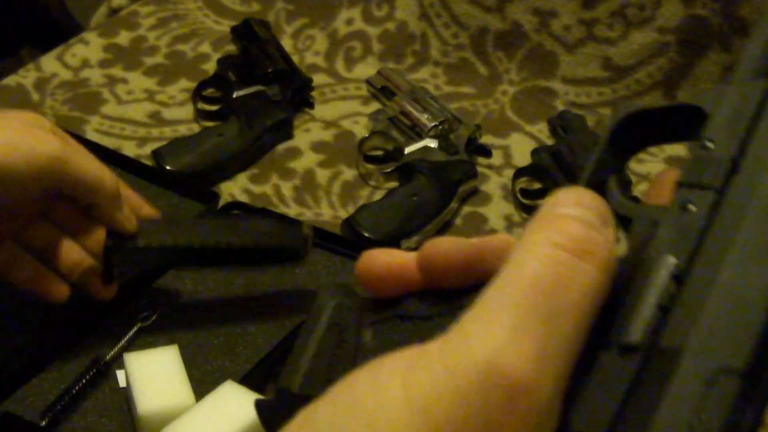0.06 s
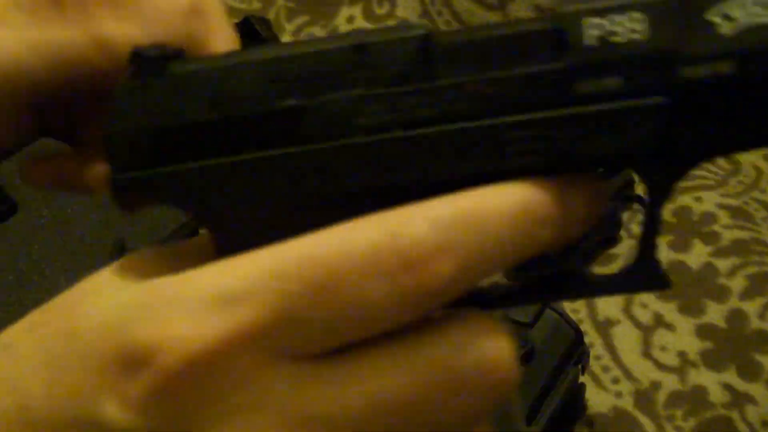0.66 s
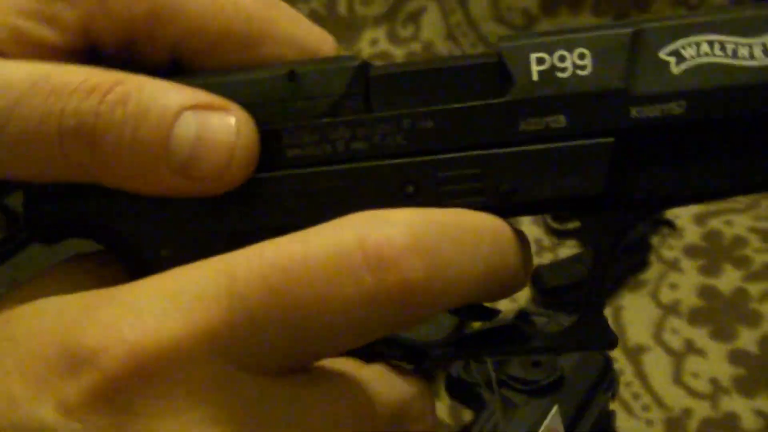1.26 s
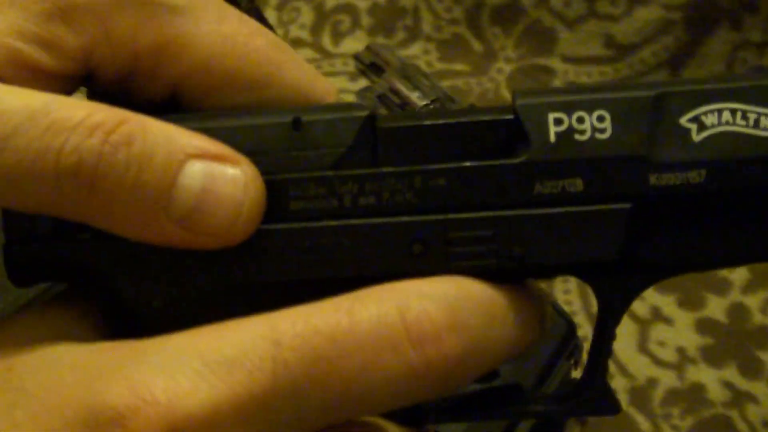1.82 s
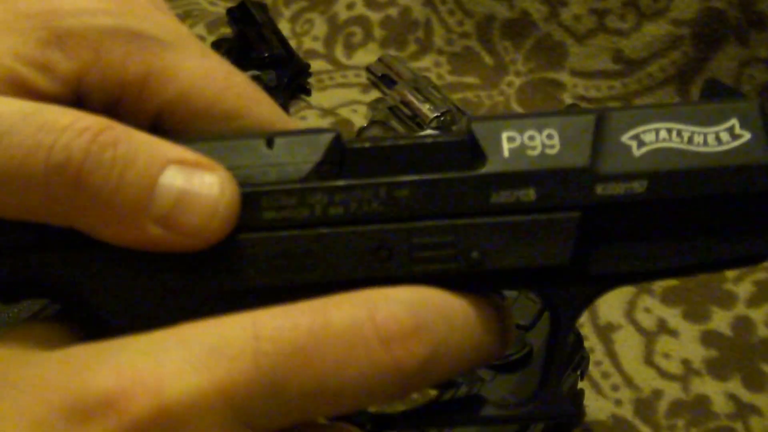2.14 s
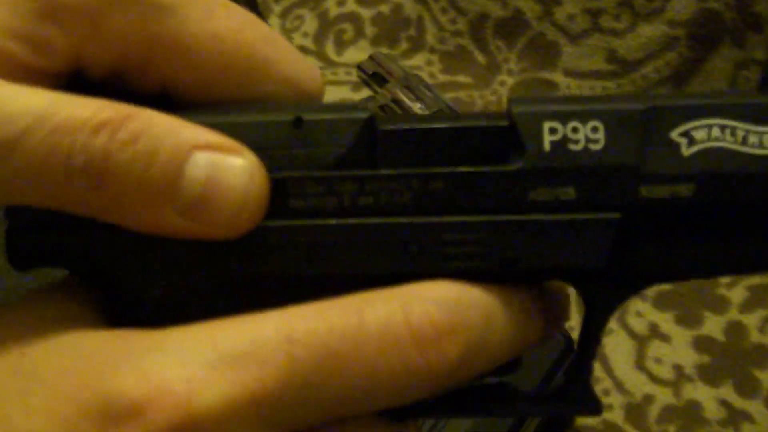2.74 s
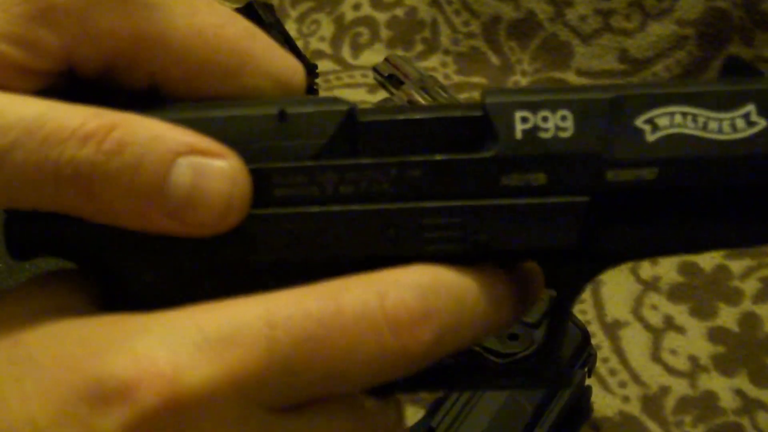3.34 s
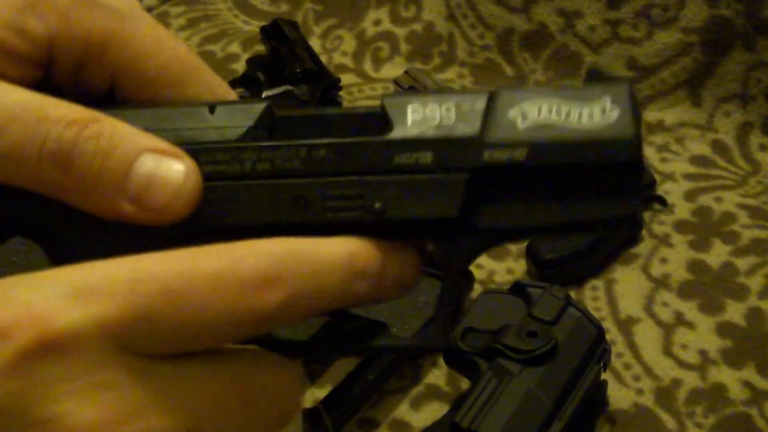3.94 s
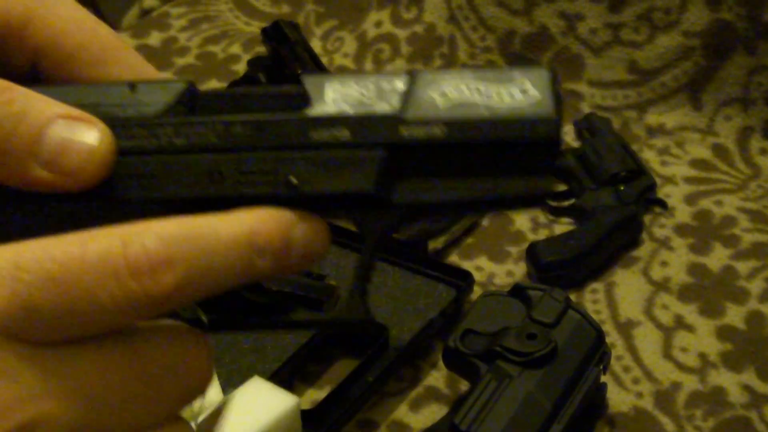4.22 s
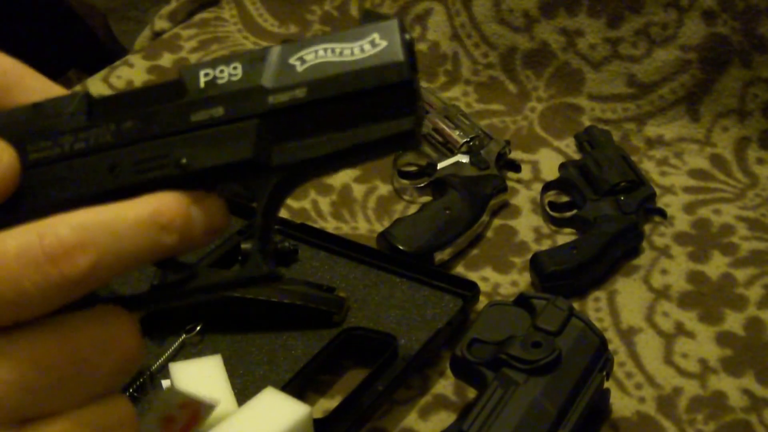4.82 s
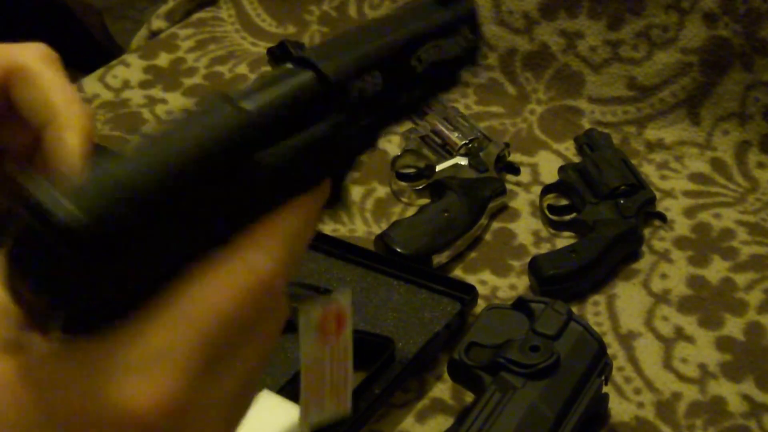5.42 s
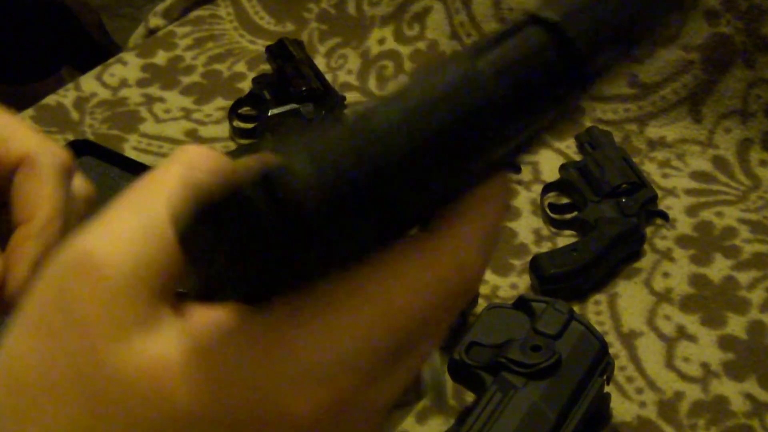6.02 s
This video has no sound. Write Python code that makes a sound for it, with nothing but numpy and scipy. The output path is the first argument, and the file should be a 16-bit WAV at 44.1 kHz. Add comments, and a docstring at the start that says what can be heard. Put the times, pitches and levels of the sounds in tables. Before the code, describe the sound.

In a furnished room, fingers softly rub a pistol close to the microphone, and its magazine knocks down on a hard case a little farther off. After a pause the slide is racked with steel scrapes and clicks, then slams shut loudly. The action snaps three times, loose parts rattle, and a faint rub and click follow. Steady room noise lies underneath, and each blow has a short fluttering echo.

```python
"""A pistol handled in a furnished room, close to the two microphone ports of a small camera.
Over steady room noise, fingers rub the gun and its magazine knocks down on a hard case farther off.
The slide is racked, steel scraping and clicking on steel, and slams shut; the action snaps three times,
loose parts rattle, and a last faint rub and click follow. The room answers each blow with a short
flutter, and the loudest blows overload the microphone and its limiter."""
import sys
import numpy as np
from scipy import signal
from scipy.fft import rfft, irfft, next_fast_len
from scipy.io import wavfile
from scipy.ndimage import uniform_filter1d

SR = 44100
rng = np.random.default_rng(int(sys.argv[2]) if len(sys.argv) > 2 else 0)


def to_wav(s):
    """Save 16-bit WAV."""
    ch = np.atleast_2d(s).T  # columns
    pcm = np.round(np.clip(ch, -1, 1) * 32767)  # PCM
    wavfile.write(sys.argv[1], SR, pcm.astype(np.int16))


N = 267631
BLOW_SAMPLES = 4096
BLOW_HZ = np.fft.rfftfreq(BLOW_SAMPLES, 1 / SR)

# spectrum of the gun's steel: frequency_hz, level_db
STEEL_SPECTRUM = [(88, -54.5), (150, -28), (244, -29), (391, -22.5), (514, -15.5), (905, -7.5), (1560, -9),
                  (1940, -4.5), (3040, -4), (3420, -2.5), (7620, -5), (9260, -6.5), (11500, -29.5),
                  (14500, -27.5), (16000, -30.5)]
# ringing partials of that steel, the slide on its rails and the loose parts: pitch_hz, level_db, t60_s
STEEL_RING = [(2497, -2, .24), (3091, -6, .26), (3259, -7, .25), (3567, -9, .22), (3997, -9, .22),
              (4457, -8, .22), (5125, -8, .22), (5421, -6, .22), (5620, -4, .24), (6853, -2, .22),
              (6918, -4, .27), (7456, -5, .2), (7612, -8, .24), (8565, -9, .27), (9114, -7, .21),
              (9340, -8, .22)]
RAIL_RING = [(1470, -1, .15), (2500, 1, .2), (2497, 1.5, 0.1), (3315, -7.5, .2), (3997, -3.5, .2),
             (4392, 1.5, .2), (6380, -6, .18)]
LOOSE_RING = [(1946, -9.5, 0.36), (2120, -11, .22), (2300, -12, 0.15), (3110, -4.5, 0.25),
              (3800, -17, 0.21), (3940, 1.5, .26), (5540, -7, .26), (7460, -1, 0.35)]
# stereo width of case, clicks and snaps at the microphone: frequency_hz, side_minus_mid_db
CASE_WIDTH = [(60, -4), (180, -27), (550, -18.5), (1650, -8.5), (4970, -6), (15000, 13)]
CLICK_WIDTH = [(60, 8), (150, -13.5), (380, -11.5), (950, -21), (2380, -14.5), (5980, -7), (15000, -3.5)]
SNAP_WIDTH = [(60, -11), (240, -4.5), (950, -16.5), (3770, -9), (15000, -1.5)]


def amp(db):
    """Decibels to gain."""
    return 10 ** (np.asarray(db) / 20)


def unit(x):
    """Scales to energy 1 per channel."""
    return x / np.sqrt(np.sum(x ** 2, -1, keepdims=True) + 1e-20)


def curve(points, hz):
    """Interpolates a table on a log-frequency axis."""
    point_hz, value = np.transpose(points)
    return np.interp(np.log(hz + 1), np.log(point_hz + 1), value)


def resonances(modes, hz):
    """Peaks and dips as a dB curve."""
    return sum(db / (1 + (2 * (hz - centre) / width) ** 2) for centre, width, db in modes)


def add(mix, start_s, sound):
    """Mixes a sound in at start_s."""
    part = mix[:, round(start_s * SR):][:, :sound.shape[-1]]
    part += sound[..., :part.shape[1]]


def port_noise(size, width):
    """White noise at two nearby microphone ports, blended from unrelated mid and side signals."""
    side_gain = amp(curve(width, np.fft.rfftfreq(size, 1 / SR)))
    mid, side = rfft(rng.standard_normal((2, size))) / np.sqrt(1 + side_gain ** 2)
    return irfft([mid + side_gain * side, mid - side_gain * side], size)


def noise(colour_db, size, width):
    """Stereo noise of rms 1 with a given spectrum."""
    return unit(irfft(rfft(port_noise(size, width)) * amp(colour_db), size)) * np.sqrt(size)


def room_tone(noise_db=-47, hum_hz=99, hum_db=-64):
    """Steady room noise with a few resonances, microphone hiss and a faint mains hum."""
    # spectrum of the quiet room and the hiss: frequency_hz, level_db
    spectrum = [(25, -36.5), (60, -21), (100, -18.5), (160, -9), (280, -7.5), (460, -10.5), (800, -9.5),
                (1200, -14), (1600, -16.5), (3000, -22.5), (8200, -29.5), (9700, -35), (11000, -47.5),
                (16000, -43)]
    # its peaks and dips: centre_hz, width_hz, gain_db
    modes = [(239.8, 16, 7.5), (656.3, 16.56, 9.5), (1329, 50, 7), (9440, 1520, 4.5), (11700, 2018, -7)]
    # its stereo width: frequency_hz, side_minus_mid_db
    width = [(60, -1.5), (150, -9), (380, -7), (950, 0), (2380, 2.5), (5980, 1), (15000, 0)]
    size = next_fast_len(N, real=True)
    hz = np.fft.rfftfreq(size, 1 / SR)
    air = noise(curve(spectrum, hz) + resonances(modes, hz), size, width)[:, :N]
    hum = np.sqrt(2) * np.sin(2 * np.pi * hum_hz * np.arange(N) / SR)
    return amp(noise_db) * air + amp(hum_db) * hum


def room(sound, width, wet_db, echo_db, linger, build_s=0.0016, cutoff_hz=13500):
    """A flutter between floor and ceiling over a short diffuse tail that lacks the top treble."""
    # decay of the room, before scaling by linger: frequency_hz, t60_s
    decay = [(200, 0.11), (530, 0.34), (1390, 0.27), (3680, 0.28), (9700, 0.23)]
    # early reflections, before echo_db is added: delay_s, level_db
    echoes = [(.0021, -9.5), (.0087, -24), (0.0128, -16.5), (0.0142, -11.5), (.0295, -18), (0.0439, -25)]
    hz, t, bands = signal.stft(port_noise(SR // 2, width), SR, nperseg=256)
    t60_s = linger * curve(decay, hz)[:, None]
    tail = signal.istft(bands * np.exp(-np.log(1000) * t / t60_s), SR)[1]
    onset = 1 - np.exp(-np.arange(tail.shape[1]) / SR / build_s)
    response = amp(wet_db) * unit(tail * onset)
    for delay_s, db in echoes:
        response[:, round(delay_s * SR)] += amp(db + echo_db)
    response = signal.lfilter(*signal.butter(2, cutoff_hz, fs=SR), response)
    return signal.fftconvolve(sound, response, axes=1)[:, :N]


def friction(strokes, grain, slips_per_s):
    """Two surfaces stick and slip unevenly, sounding the steel under each stroke."""
    out = np.zeros((2, N))
    wander = np.interp(np.arange(N) * slips_per_s / SR, np.arange(N), rng.standard_normal(N))
    slips = np.exp(grain * wander)
    hz = np.fft.rfftfreq(SR, 1 / SR)
    for start_s, length_s, db, centre_hz, width_hz in strokes:
        size = int(length_s * SR)
        band_db = -20 * np.log10(1 + (2 * (hz - centre_hz) / width_hz) ** 2)
        hiss = noise(band_db + curve(STEEL_SPECTRUM, hz), SR, CLICK_WIDTH)[:, :size]
        grit = hiss * slips[int(start_s * SR):][:size]
        add(out, start_s, amp(db) * unit(grit) * np.sqrt(size) * np.hanning(size))
    return out


def fingers(centre_hz=4260, width_hz=13000):
    """Skin slides over the gun with a soft, uneven hiss."""
    # finger strokes: start_s, length_s, level_db
    rubs = [(0.273, 0.5, -55), (0.896, 0.31, -58.5), (1.176, 0.096, -53), (1.32, 0.15, -52),
            (1.492, 0.042, -51.5), (1.559, 0.053, -54.5), (5.502, .077, -51), (5.591, 0.086, -55.5)]
    return friction([(*rub, centre_hz, width_hz) for rub in rubs], grain=0.39, slips_per_s=130)


def scrapes():
    """Steel slides on steel between the clicks, with a fine, fast grain."""
    # strokes of the moving parts: start_s, length_s, level_db, centre_hz, width_hz
    strokes = [(.025, 0.044, -37.5, 7000, 8000), (2.445, 0.06, -35, 4500, 11000),
               (2.485, 0.062, -32.5, 3500, 9000), (2.635, 0.28, -36, 3400, 3600),
               (3.92, .22, -27.5, 3130, 1860), (4.08, 0.28, -37.5, 4980, 11000),
               (5.38, .1, -55.5, 2555, 298)]
    return friction(strokes, grain=0.28, slips_per_s=1300)


def blow(body_db, tilt, bass_db, contact_s, width, chatter, chatter_hz=1200, bass_hz=1100, pivot_hz=4000):
    """One impact and the fine chatter of its contact, passed through the resonances of a body."""
    tilt_db = tilt * np.log2(np.clip(BLOW_HZ / pivot_hz, 1 / 2, 2))
    shelf_db = bass_db / (1 + (BLOW_HZ / bass_hz) ** 4)
    log_gain = np.log(amp(np.maximum(body_db + tilt_db + shelf_db, -100)))
    # minimum phase: the body sounds only after it is struck
    body = np.exp(np.conj(signal.hilbert(np.r_[log_gain, log_gain[-2:0:-1]])))[:len(BLOW_HZ)]
    sample = np.arange(BLOW_SAMPLES)
    grit = rfft(unit(port_noise(BLOW_SAMPLES, width) * np.exp(-sample / SR / contact_s)))
    # the bass feels one clean push; only the treble feels the roughness of the contact
    roughness = chatter * BLOW_HZ / np.hypot(BLOW_HZ, chatter_hz)
    force = (1 + roughness * grit) / np.hypot(1, roughness)
    fade = np.minimum(1, 2 - 2 * sample / BLOW_SAMPLES) ** 2
    return unit(irfft(force * body) * fade) * np.sqrt(SR / 1000)


def knocks():
    """The magazine lands on the hard case; the grip bumps in the hand."""
    # dull knocks: start_s, level_db, tilt_db_per_octave, bass_db, contact_s
    hits = [(.3105, -37.5, 8, 3, 0.0069), (0.3698, -33, -9, -9, 0.00095), (0.4805, -3.5, -2, -5.5, 0.00051),
            (2.137, -33.5, -5, 2, 0.0026)]
    # spectrum of the case: frequency_hz, level_db
    case_spectrum = [(60, -22), (110, -15), (170, -3), (300, 0), (500, -2), (800, -1), (1500, -4.5),
                     (2400, -2.5), (3400, -13.5), (5000, -23), (8500, -34), (11000, -41), (16000, -83)]
    # its peaks and dips: centre_hz, width_hz, gain_db
    case_modes = [(257, 28, 18), (360, 45, -30), (666, 41, 11), (1101, 30, 10), (1367, 36, 10),
                  (2530, 2100, 2)]
    body_db = curve(case_spectrum, BLOW_HZ) + resonances(case_modes, BLOW_HZ)
    out = np.zeros((2, N))
    for start_s, db, tilt, bass_db, contact_s in hits:
        add(out, start_s, amp(db) * blow(body_db, tilt, bass_db, contact_s, CASE_WIDTH, chatter=0.33))
    return out


def after_ring(hit, partials, ring_db, spread_db=3):
    """The steel rings on, ring_db relative to the hit; each blow wakes its modes a little differently."""
    hz, mode_db, t60_s = np.transpose(partials)[:, :, None]
    t = np.arange(SR // 3) / SR
    modes = amp(mode_db) * np.exp((2j * np.pi * hz - np.log(1000) / t60_s) * t)
    gains = amp(spread_db * rng.standard_normal(len(modes)))
    phases = np.exp(2j * np.pi * rng.random(len(modes)))
    ring = unit(((gains * phases) @ modes).imag)
    return amp(ring_db) * np.linalg.norm(hit[0]) * ring


def bounces(ticks_per_s=55, jitter=0.6, spread_db=2):
    """Loose parts bounce at uneven gaps in fading runs; gives rows of start_s, level_db, contact_kind."""
    # runs of lesser ticks: start_s, length_s, first_db, fall_db, contact_kind
    runs = [(2.525, 0.076, -13, 12, "rail"), (2.652, 0.071, -23.5, 1, "rail"),
            (4.2, 0.099, -19, 19, "rattle")]
    ticks = []
    for start_s, length_s, first_db, fall_db, kind in runs:
        count = max(1, round(length_s * ticks_per_s))
        for k, (shift, accent) in enumerate(rng.uniform(-1.2, 1, size=(32, 2))[:count]):
            progress = (k + .5 + .5 * jitter * shift) / count
            db = first_db - fall_db * progress + spread_db * accent
            ticks.append((start_s + length_s * progress, db, kind))
    return ticks


def clicks(width_share=0.2):
    """Slide, spring and levers clatter; each kind of contact favours one resonance and rings a part."""
    # the clicks that stand out: start_s, level_db, contact_kind
    main_clicks = [ (0.0422, -25, "touch"), (2.4285, -16.5, "touch"), (2.4552, -23.5, "edge"),
                   (2.4767, -1.5, "edge"), (2.4945, -5.5, "rail"), (2.5024, -3.5, "edge"),
                   (2.5205, 1.5, "rail"), (2.5411, -3.5, "rail"), (2.5463, -2.5, "edge"),
                   (2.5698, -6.5, "rail"), (2.6297, -4, "lug"), (2.6757, -7.5, "rail"),
                   (2.6809, -14.5, "edge"), (2.7097, -4, "lug"), (2.7163, -15, "rail"),
                   (2.7387, -3, "rail"), (3.7330, -7.5, "lever"), (3.825, -10.5, "lever"),
                   (3.8522, -10, "lever"), (3.9131, -6.5, "rattle"), (3.9270, -8.5, "rattle"),
                   (3.977, -8.5, "rattle"), (4.0126, -8.5, "rattle"), (4.0172, -10, "rattle"),
                   (4.0650, -8, "rattle"), (4.1211, -10.5, "rattle"), (4.146, -14, "rattle"),
                   (4.1611, -15.5, "rattle"), (4.1838, -15, "rattle"), (5.74, -39, "lug")]
    # the ways in which steel parts meet, by contact_kind:
    # tilt_db_per_octave, bass_db, contact_s, resonance_hz, resonance_db, ring_db, partials
    contacts = { "touch": (-6.5, -12, .0015, 5700, 10, -16.5, RAIL_RING),
                "edge": (0, -7.5, 0.0036, 6400, 2, -13.5, RAIL_RING),
                "rail": (-2.4, -13.5, .002, 2580, 12.5, -24.5, RAIL_RING),
                "lug": (-5.5, -18, .0007, 3850, 6.5, -19, RAIL_RING),
                "lever": (4.1, 9.7, 0.0026, 7700, 3.5, -13, STEEL_RING),
                "rattle": (5.04, -3.5, .002, 2050, 7.9, -12.5, LOOSE_RING)}
    out = np.zeros((2, N))
    for start_s, db, kind in main_clicks + bounces():
        tilt, bass_db, contact_s, hz, peak_db, ring_db, partials = contacts[kind]
        body_db = curve(STEEL_SPECTRUM, BLOW_HZ) + resonances([(hz, width_share * hz, peak_db)], BLOW_HZ)
        hit = amp(db) * blow(body_db, tilt, bass_db, contact_s, CLICK_WIDTH, chatter=3.1)
        add(out, start_s, hit)
        add(out, start_s, after_ring(hit, partials, ring_db))
    return out


def snaps():
    """Springs slam the slide shut and snap the action; gives the direct sound and the room's share."""
    # hard blows: start_s, level_db, tilt_db_per_octave, bass_db, contact_s, ring_db, room_send_db
    hits = [(2.7678, 11, 2, -9.5, 0.0014, -18.5, -4.5), (3.0119, 2, 1, -2, 0.00028, -21.5, -1),
            (3.3934, -4.5, 2.5, 11, 0.002, -44, 1.5), (3.6132, 4.5, 3, 6.5, 0.0011, -29.5, -2.5)]
    # peaks and dips of the four parts, struck in turn: centre_hz, width_hz, gain_db
    slide = [(1070, 290, 9.5), (1970, 1400, 5), (4200, 400, 13.5), (5300, 410, 11.5), (6764, 1150, 12)]
    hammer = [(277, 147, 18.5), (453, 120, 7.5), (597, 40, 10.5), (1137, 230, -11.5), (2760, 1040, 7.5),
              (3420, 1180, -18), (4920, 690, 2), (5730, 360, -20.5), (6600, 830, 4), (8500, 370, -10.5),
              (9030, 860, 9), (12900, 3000, 13)]
    sear = [(1000, 500, -3), (1950, 400, 5), (3700, 900, 2), (7000, 3000, 2), (11500, 2000, 6)]
    catch = [(1300, 1400, -6), (3950, 800, 10), (5200, 1400, 4), (7700, 1100, 7)]
    direct, sent = np.zeros((2, 2, N))
    for row, part in zip(hits, [slide, hammer, sear, catch]):
        start_s, db, tilt, bass_db, contact_s, ring_db, send_db = row
        body_db = curve(STEEL_SPECTRUM, BLOW_HZ) + resonances(part, BLOW_HZ)
        hit = amp(db) * blow(body_db, tilt, bass_db, contact_s, SNAP_WIDTH, chatter=0.95)
        for sound in hit, after_ring(hit, STEEL_RING, ring_db):
            add(direct, start_s, sound)
            add(sent, start_s, amp(send_db) * sound)
    return direct, sent


def scene():
    """The gun is near the microphone, the case lies farther off, and the room answers both."""
    case = knocks()
    clatter = clicks() + scrapes()
    blows, blows_sent = snaps()
    return (fingers() + room_tone() + case + clatter + blows
            + room(case, CASE_WIDTH, wet_db=1.0, echo_db=2.5, linger=0.82)
            + room(clatter, CLICK_WIDTH, wet_db=-4.0, echo_db=-2.5, linger=0.97)
            + room(blows_sent, SNAP_WIDTH, wet_db=-0.5, echo_db=3.0, linger=1.053))


def record(dry, threshold_db=-8, recovery_db_per_s=400, attack_s=0.0018, lopsided=0.32, cutoff_hz=16200):
    """The camera's fast limiter ducks after each hard blow, whose first cycles clip; the top is cut."""
    pole = np.exp(-1 / (attack_s * SR))
    smoother = [1 - pole], [1, -pole]
    power_db = 10 * np.log10(signal.lfilter(*smoother, (dry ** 2).mean(0)) + 1e-12)
    recovery_db = np.arange(N) * recovery_db_per_s / SR
    held_db = np.maximum.accumulate(power_db + recovery_db) - recovery_db
    over_db = np.maximum(held_db - threshold_db, 0)
    limited = dry * amp(-signal.lfilter(*smoother, over_db))
    # overload pushes the input off centre for a moment, which adds a low thump
    offset = lopsided * uniform_filter1d(np.maximum(abs(limited) - 1, 0), size=24)
    clipped = np.clip(limited - offset, -1, 1)
    lowpass = signal.firwin(255, cutoff_hz, window=("kaiser", 8), fs=SR)
    return signal.oaconvolve(clipped, lowpass[None], "same")


dry = scene()
out = record(dry)
to_wav(out)
```